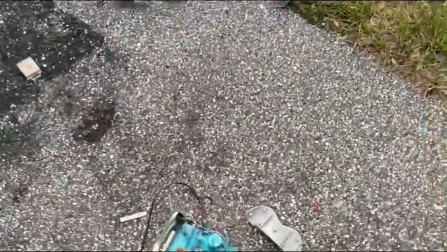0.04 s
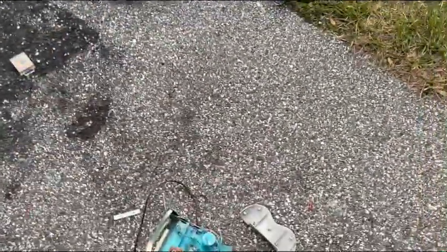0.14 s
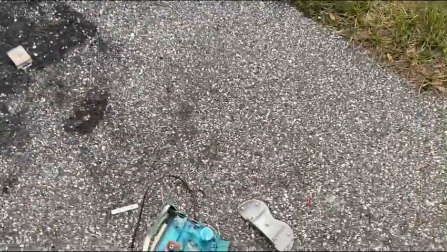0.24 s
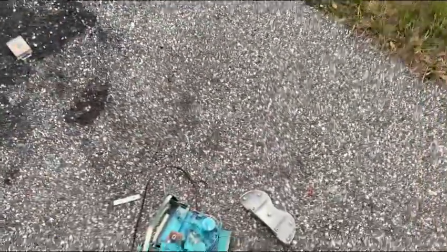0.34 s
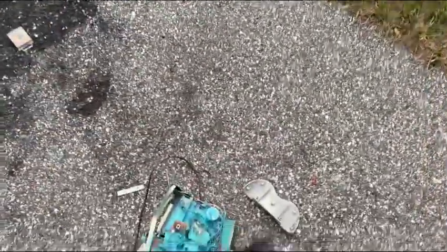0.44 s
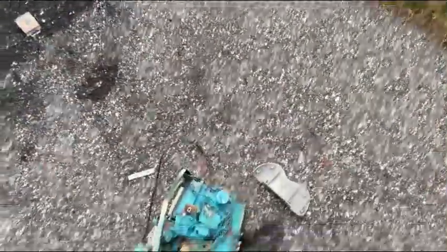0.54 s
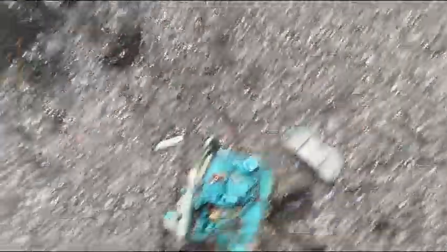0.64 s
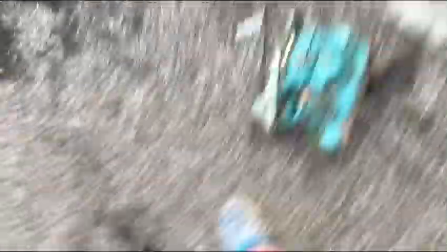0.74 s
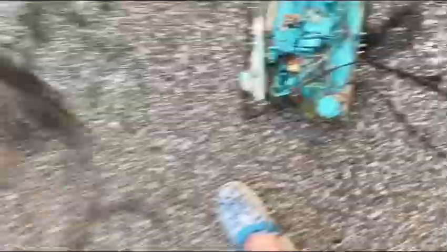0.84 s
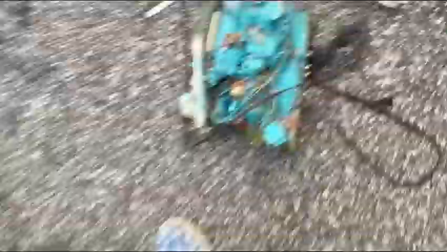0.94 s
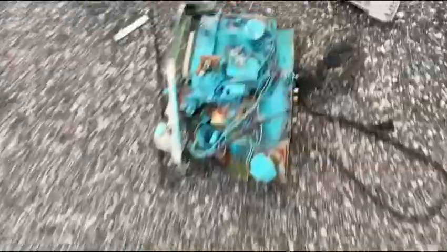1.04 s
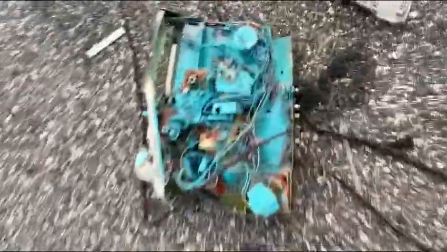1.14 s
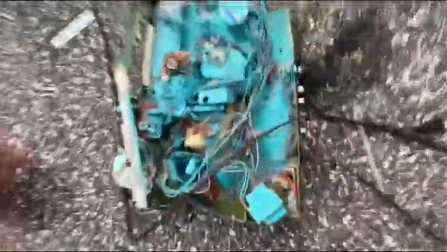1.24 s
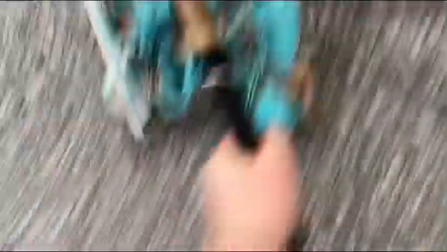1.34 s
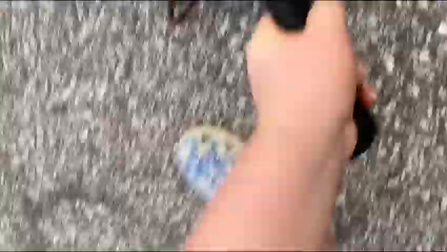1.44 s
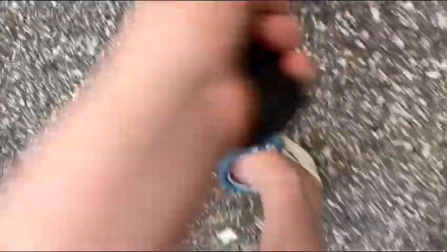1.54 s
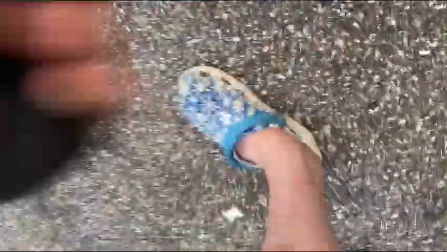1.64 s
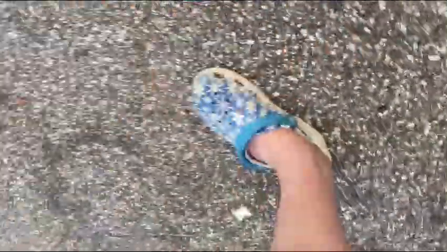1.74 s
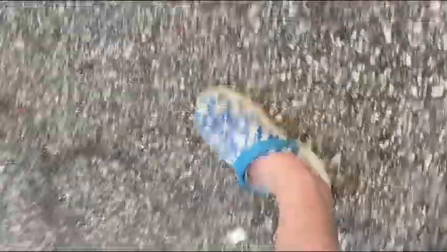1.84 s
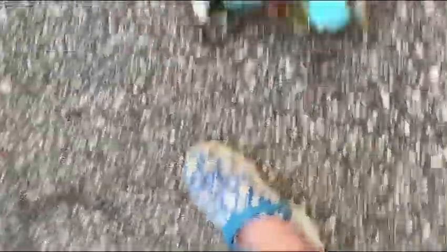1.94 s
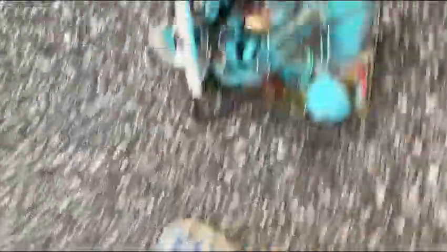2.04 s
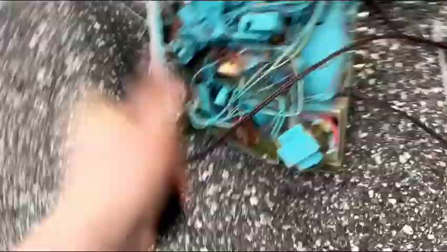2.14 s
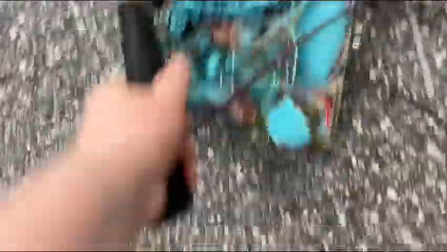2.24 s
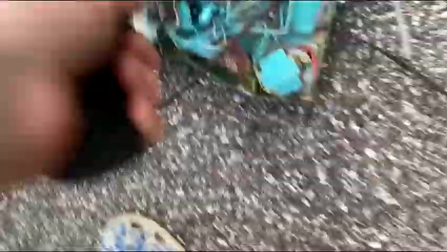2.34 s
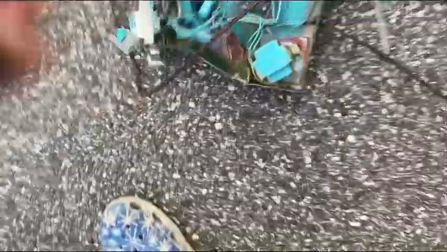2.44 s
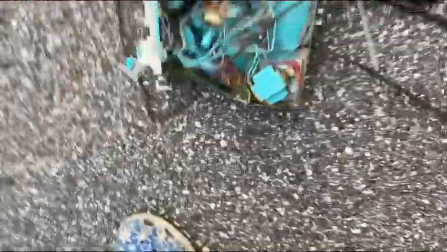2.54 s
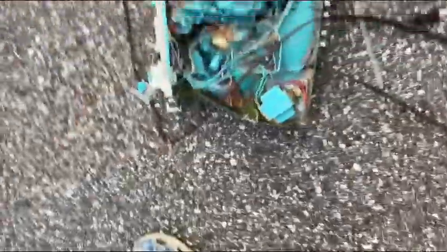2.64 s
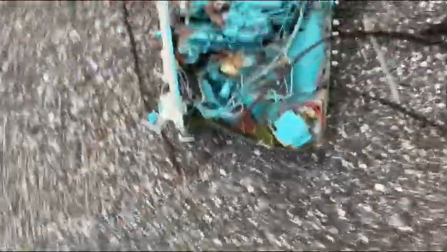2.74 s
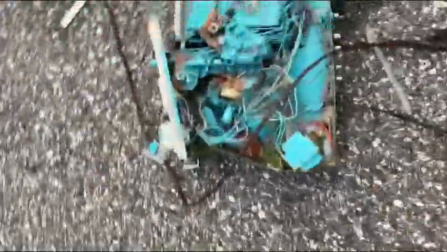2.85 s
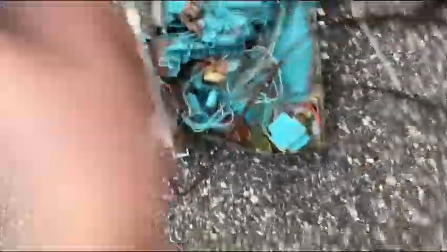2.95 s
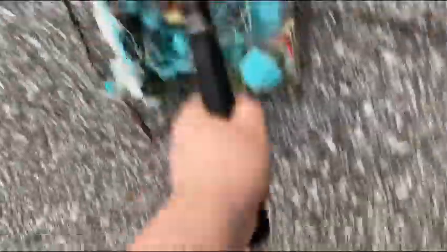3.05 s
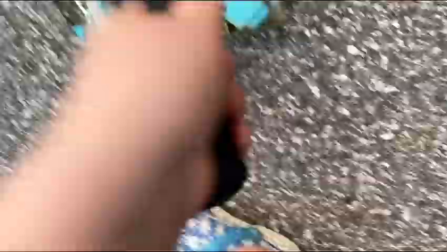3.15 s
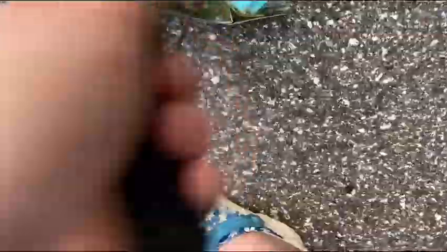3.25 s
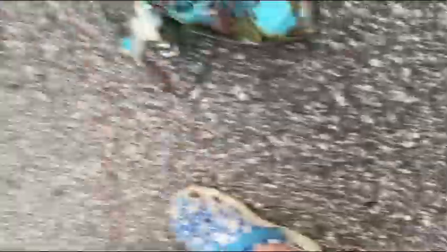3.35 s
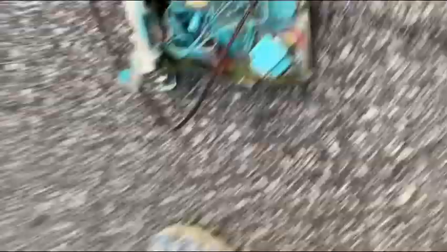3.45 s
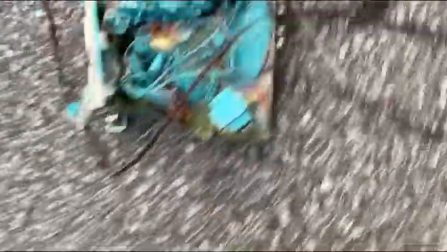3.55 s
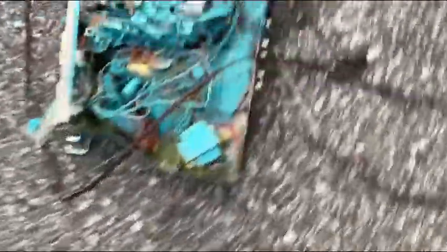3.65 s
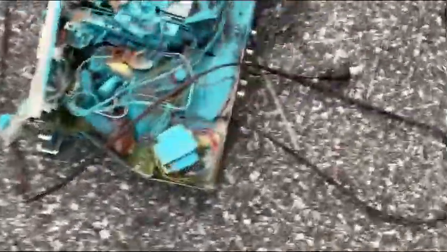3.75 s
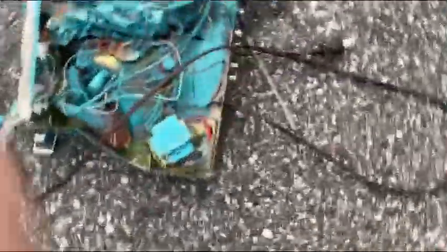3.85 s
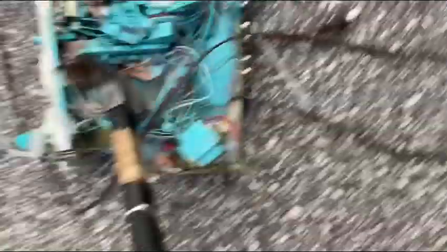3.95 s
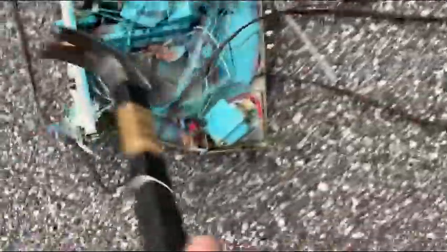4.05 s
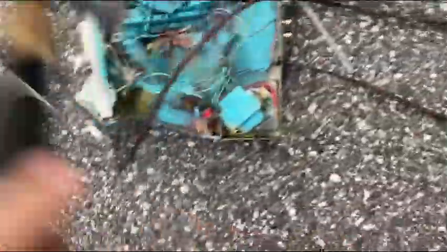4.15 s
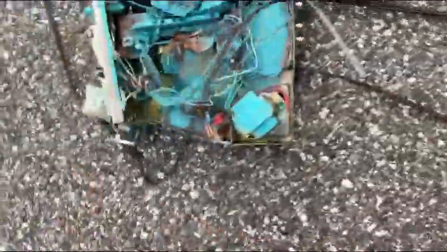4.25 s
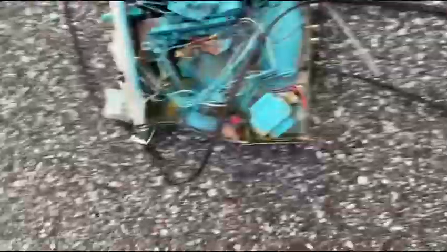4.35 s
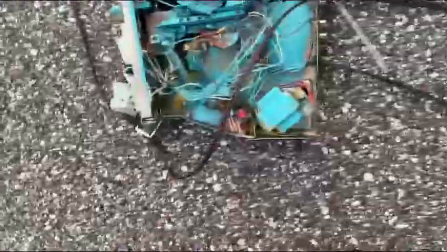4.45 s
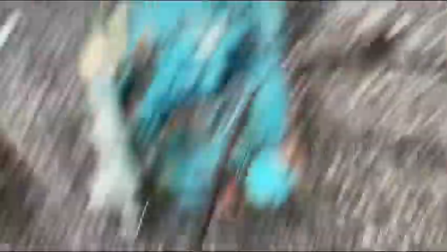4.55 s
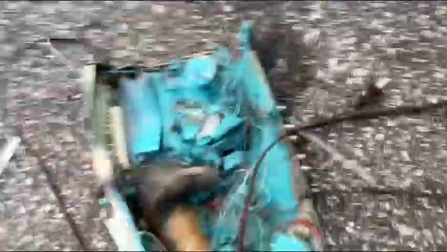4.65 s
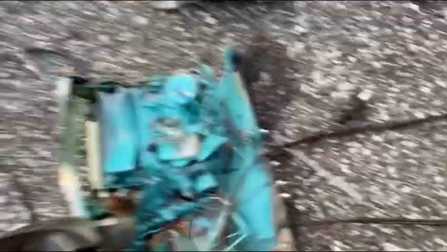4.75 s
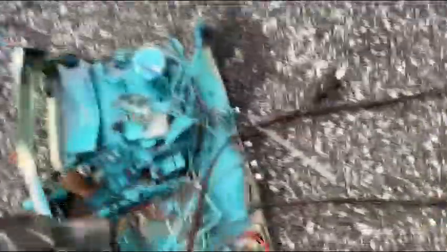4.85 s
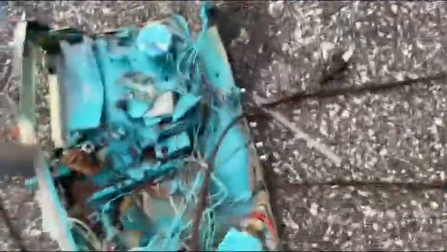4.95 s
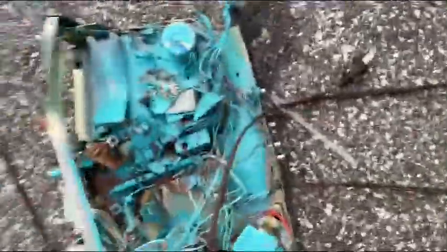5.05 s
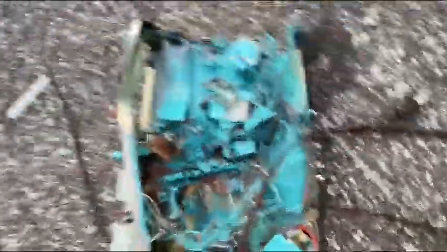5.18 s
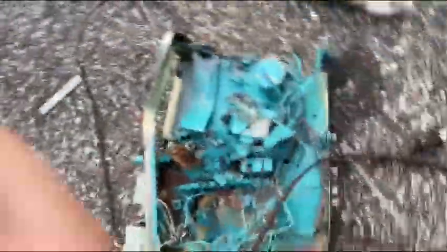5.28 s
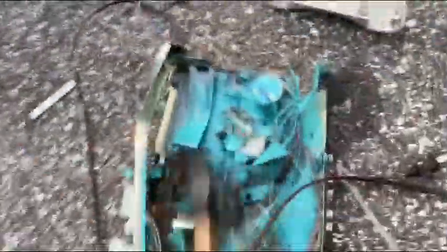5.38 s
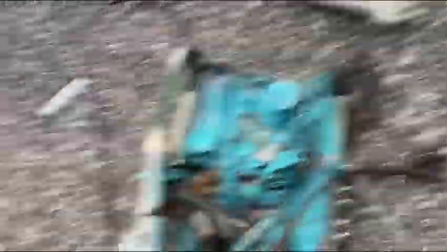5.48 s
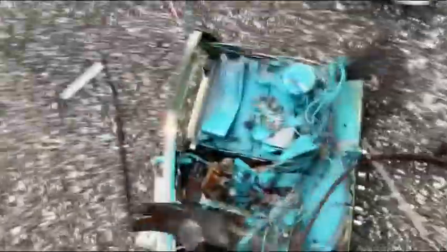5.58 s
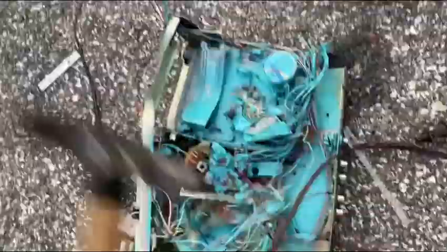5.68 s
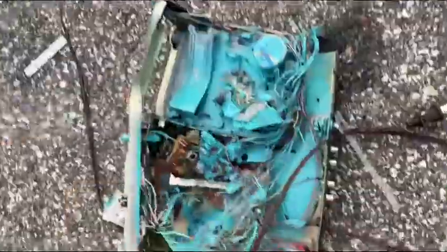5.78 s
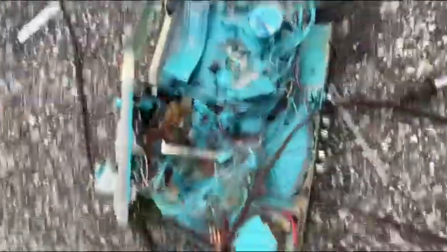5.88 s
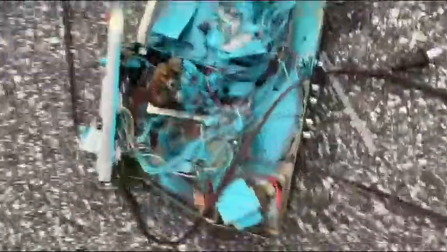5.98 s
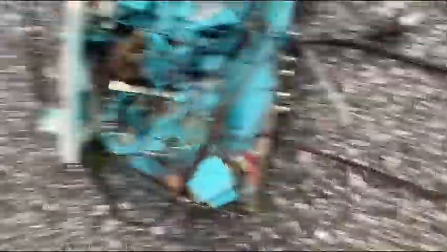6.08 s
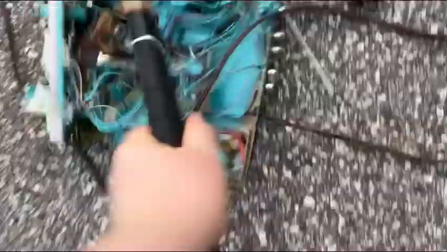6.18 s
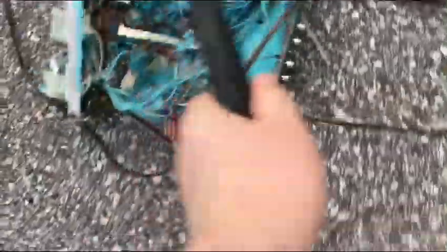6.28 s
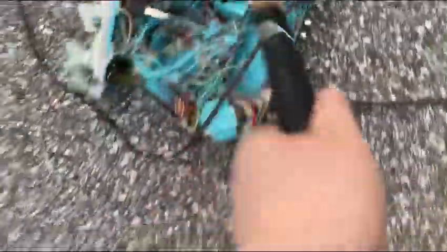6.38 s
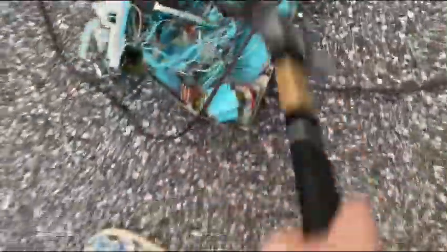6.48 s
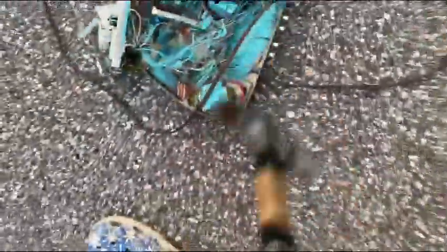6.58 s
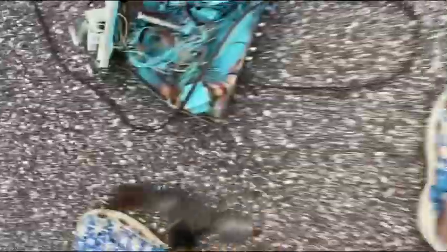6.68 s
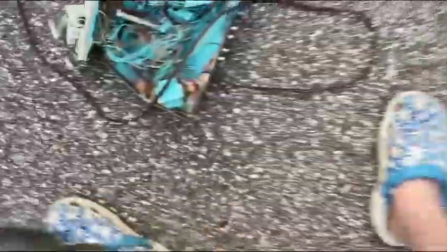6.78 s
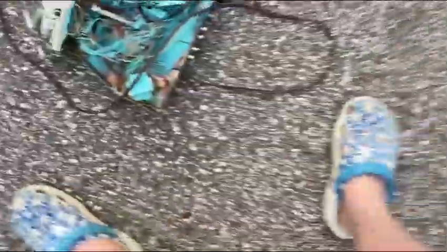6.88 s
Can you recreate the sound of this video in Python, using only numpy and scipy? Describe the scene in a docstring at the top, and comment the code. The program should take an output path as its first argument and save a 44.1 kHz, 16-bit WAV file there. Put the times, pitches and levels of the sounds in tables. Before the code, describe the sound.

Seven hard hammer blows crack a gutted plastic casing on pavement about every 0.8 seconds, debris clattering after each, wind fluttering at the microphone.

```python
"""Outdoors on asphalt, close to a hand-held recorder: seven hammer blows on a broken plastic casing.
Wind and its flutter are shaped noise in gusts over a faint hiss; jolts and wind thumps are short bass pulses.
Each blow is three noise cracks through casing modes, a jolt with a recoil, and a thin two-tone hum.
Casing and shards knock as noise bursts and rattle as clumped noise with short ringing taps.
The recorder's bass filter smears every bass pulse into a falling thump; loud peaks overload softly."""
import sys
import numpy as np
from scipy import signal
from scipy.fft import rfft, irfft, next_fast_len
from scipy.io import wavfile

SR = 44100
rng = np.random.default_rng(int(sys.argv[2]) if len(sys.argv) > 2 else 0)


def wav_record(signal):
    """Record a signal, one row per channel, as 16-bit PCM in the file named by sys.argv[1]."""
    frames = np.transpose(np.atleast_2d(signal))
    bounded = np.clip(frames, -1, 1)
    # unit amplitude maps onto the largest positive 16-bit level
    quanta = np.round(bounded * 32767).astype(np.int16)
    wavfile.write(sys.argv[1], SR, quanta)


N = 305126
HZ = np.fft.rfftfreq(next_fast_len(N + 8192, True), 1 / SR)
SIZE = 2 * len(HZ) - 2


def gain_of(db):
    """Decibels to gain."""
    return 10 ** (np.asarray(db) / 20)


def evened(x):
    """Scales to rms 1."""
    return x / np.sqrt(np.mean(x ** 2) + 1e-20)


def read(points, hz):
    """Reads a spectrum table on a log-frequency axis."""
    f, value = np.transpose(points)
    return np.interp(np.log(hz + 1), np.log(f + 1), value)


def add(mix, s, sound):
    """Lays a two-channel sound into the mix at time s."""
    part = mix[:, round(s * SR):][:, :sound.shape[-1]]
    part += sound[..., :part.shape[1]]


def coloured(x, gain):
    """Filters by a gain over HZ, scaled to keep the power of white noise."""
    unit_gain = gain / np.sqrt(np.mean(abs(gain) ** 2))
    return irfft(rfft(x, SIZE) * unit_gain, SIZE)[..., :N]


def blended(x, same_table, lean, hz):
    """Makes two unrelated spectra alike by degrees; lean is the left gain, its inverse the right."""
    same = np.clip(read(same_table, hz), 0, 1)
    right = same * x[0] + np.sqrt(1 - same ** 2) * x[1]
    return np.array([x[0] * lean, right / lean])


def ringing(x, hz, share):
    """A two-pole resonance as wide as a share of its pitch; white noise keeps its power."""
    r = np.exp(-np.pi * share * hz / SR)
    turn = 2 * np.pi * hz / SR
    return signal.lfilter([2 * np.sin(turn) * np.sqrt(1 - r)], [1, -2 * r * np.cos(turn), r * r], x)


# Bell-shaped gusts on the ports: [peak t/s, level/dB, half width to 1/e /s, flutter/dB re level]
GUSTS = [(.05, -74, .08, -4), (0.258, -39, .045, 0), (.45, -76.5, 0.061, 6), (0.678, -57, .06, 1),
         (0.829, -43, 0.09, -1), (1.061, -47, .045, -9.5), (1.201, -41.5, 0.074, -8.5),
         (1.46, -47, 0.14, -9), (1.68, -56, 0.068, -12.5), (1.81, -44.5, 0.02, -1),
         (1.889, -39.5, 0.025, -4.5), (2.03, -54.5, 0.072, -5), (2.419, -53, .09, -8.5),
         (2.901, -43.5, .05, -19.5), (3.31, -50, .07, -18.5), (3.72, -63.5, 0.22, -10.5),
         (4.011, -51, 0.066, -13.5), (4.29, -51.5, .07, -7), (5.04, -50.5, 0.049, -11.5),
         (5.15, -52, 0.049, -14), (5.58, -60, 0.086, -8.5), (5.911, -58.5, 0.084, -15.5),
         (6.39, -57, .13, -14.5), (6.601, -48.5, .065, -9), (6.87, -42, .045, -8)]
# Rumble colour: [f/Hz, relative density/dB]
RUMBLE = [(20, -32.5), (40, -0.5), (70, 4.5), (130, 1.5), (250, -8.5), (400, -42.5), (1200, -120)]
# Flutter colour: [f/Hz, relative density/dB]
FLUTTER = [(70, -19), (130, -1), (230, 4), (400, -4), (700, -17), (1200, -30.5), (2000, -60), (4000, -120)]
# Wind, left-right likeness: [f/Hz, likeness 0..1]
WIND_SAME = [(40, 0.83), (130, 0.36), (300, 0.069), (640, 0.033)]
# Outdoor hiss colour: [f/Hz, relative density/dB]
AIR = [(300, -27.5), (600, -4.5), (1000, 0.5), (2400, -1), (5000, -6), (8000, -10.5), (9500, -17),
       (16500, -30)]
AIR_DB = -74.5
CALM_DB, CALM_FLUTTER_DB = -66, -78.5  # breeze between gusts


def wind():
    """Eddies burst on the ports: lumpy low rumble, flutter above it in the gusts, faint hiss under both."""
    t = np.arange(N) / SR
    low, high, air = rng.standard_normal((3, 2, N))
    lumps_db = 3.0 * evened(coloured(rng.standard_normal(N), 1 / (1 + (HZ / 25.) ** 4)))
    low = coloured(low, gain_of(read(RUMBLE, HZ)))
    high = coloured(high, gain_of(read(FLUTTER, HZ)))

    force, flutter = gain_of(CALM_DB), gain_of(CALM_FLUTTER_DB)
    for s, db, half_s, flutter_db in GUSTS:
        gust = gain_of(db) * np.exp(-((t - s) / half_s) ** 2)
        force = force + gust
        flutter = flutter + gust * gain_of(flutter_db)
    rumble = (force * low + flutter * gain_of(lumps_db) * high) * gain_of(.5 * lumps_db)
    rumble = irfft(blended(rfft(rumble, SIZE), WIND_SAME, 1, HZ), SIZE)[:, :N]

    drift_db = 1.3 * evened(coloured(rng.standard_normal(N), 1 / (1 + (HZ / 3.) ** 4)))
    return rumble + gain_of(AIR_DB + drift_db) * coloured(air, gain_of(read(AIR, HZ)))


# Hammer blows: [t/s, relative level/dB, relative snap/dB, first piece f/Hz, later piece f/Hz,
# second crack/dB re first, last crack/dB re first, grit level/dB, relative jolt level/dB,
# jolt sharpness/dB, recoil/dB re jolt, hum level/dB]
BLOWS = [(1.263, 0, -14, 2264, 1085, -4.5, -9.5, -21, -14, 6, -6, -69),
         (2.1, -2.5, -14.5, 2797, 1479, 4, -4, -21, -16, 2, -11, -67.5),
         (2.953, 2, -15.5, 1653, 1248, -5, -21, -25.5, -15, 6.5, -8, -82.5),
         (3.833, 1.5, -15.5, 1031, 1182, -1.5, -6, -21.5, -41.5, 12, -20.5, -80.5),
         (4.578, 2, -11.5, 2908, 1184, -4, -12, -21.5, -54.5, 10.5, -23, -74),
         (5.322, 4, -16.5, 1935, 1592, -7, -19, -27.5, -17, -2.5, -5, -89),
         (6.11, 1, -10.5, 1655, 1679, -8.5, -9, -26.5, -9, -8, -3.5, -96.5)]
# Other low thumps, from wind buffets or from casing and ground:
# [t/s, relative level/dB, sharp part/dB re dull push]
THUMPS = [(.222, -32.5, -8), (.272, -26, -6.5), (1.021, -42, 0), (1.36, -36.5, -8), (1.392, -38.5, -23.5),
          (1.456, -38.5, -0.5), (1.654, -33.5, -27), (1.802, -32.5, -25), (1.887, -32.5, -11),
          (2.198, -46, -7.5), (2.289, -41, -2), (3.023, -32.5, -5), (3.128, -36, -12.5), (3.181, -43.5, 4),
          (3.248, -33.5, -19), (5.403, -39.5, -8.5), (6.184, -29.5, 1), (6.288, -34, -0.5),
          (6.337, -37.5, -1), (6.562, -32, -23)]
RECOIL_S, RECOIL_SHARP_DB = .027, -32  # the ground answers with a duller jolt


def pushes():
    """Every other thump, and the jolt and recoil of every blow."""
    rows = list(THUMPS)
    for s, *_, db, sharp_db, recoil_db, _ in BLOWS:
        rows.append((s, db, sharp_db))
        rows.append((s + RECOIL_S, db + recoil_db, RECOIL_SHARP_DB))
    return rows


# Thump colour: [f/Hz, relative level/dB]
THUMP = [(20, -25), (45, -7), (70, 5.5), (150, 1), (400, -4.5), (1000, -10)]


def thumps():
    """Single bass pushes: a dull part and a sharper part above it; the right port leads a little."""
    out, hz = np.zeros((2, N)), np.fft.rfftfreq(8192, 1 / SR)
    dull = 1 / (1 + (hz / 170.0) ** 4)
    ports = gain_of([[.5], [-.5]]) * np.exp([[-.5j], [.5j]] * (.9 * hz / (hz + 150.0)))
    for s, db, sharp_db in pushes():
        edge = dull + gain_of(sharp_db) * (1 - dull) / (1 + (hz / 663.0) ** 4)
        push = irfft(gain_of(read(THUMP, hz)) * edge * ports)
        push = np.roll(push, 4096, axis=1)  # centred in its buffer
        add(out, s - 4096 / SR, gain_of(db + 42.0) * push)
    return out


# Shell modes: [f/Hz, width/Hz, relative level/dB]
CASING = [(982, 40, -16.5), (1220, 13, -1), (1460, 27, -11.5), (1760, 92, -8.5), (2280, 140, -14.5),
          (2900, 60, -8.5), (4320, 630, -11.5), (6800, 250, -5)]
# Broad colour of the plastic: [f/Hz, relative level/dB]
SHELL = [(300, -37.5), (600, -23), (900, 5.5), (1600, 5.5), (3000, 2.5), (5000, -3.5), (8000, -30)]
# Colour of a snap: [f/Hz, relative level/dB]
SNAP = [(3000, -27.5), (5000, -1), (7000, 2.5), (9000, -2), (11000, 0), (14000, -4.5), (16500, -13.5)]
# Casing at the ports, left-right likeness: [f/Hz, likeness 0..1]
PORTS_SAME = [(100, 0.81), (700, 0.95), (1400, .85), (3100, 0.7), (6800, 0.3), (8000, .8), (16000, 1)]
# Casing at the ports, left-right level: [f/Hz, left re right/dB]
PORTS_LEAN = [(400, -1.5), (700, 8.5), (1300, -4.5), (2400, 2.5), (4400, 4.5), (8000, 0), (15000, -1)]
# Right-channel phase turns half a cycle across each: [f/Hz]
FLIPS_HZ = [8290, 9820, 12420, 13700]


def casing(body, snap, loose):
    """Excitation rings the shell's modes; snaps keep their treble; all reach two ports."""
    modes = sum(gain_of(db) * width * f / (f ** 2 - HZ ** 2 + 1j * width * HZ) * 1j
                for f, width, db in CASING)
    sound = coloured(body, gain_of(read(SHELL, HZ)) + 2.4 * modes)
    sound = sound + coloured(snap, gain_of(read(SNAP, HZ)))
    sound = sound + loose * [[1], [1]]
    ports = blended(rfft(sound, SIZE), PORTS_SAME, gain_of(read(PORTS_LEAN, HZ) / 2), HZ)
    half_turns = sum(1 + np.tanh((HZ - flip_hz) / 280.0) for flip_hz in FLIPS_HZ)
    ports[1] *= np.exp(.5j * np.pi * half_turns)
    return irfft(ports, SIZE)[:, :N]


# Small knocks of casing and shards: [t/s, relative level/dB, relative snap/dB, loose piece f/Hz]
KNOCKS = [(1.399, -38.5, -1.5, 1296), (1.44, -28, -20, 1170), (1.458, -20.5, -13.5, 2393),
          (1.493, -29, -7, 2930), (1.499, -19.5, -22, 1232), (1.558, -59.5, -5, 5550),
          (1.621, -59, 0, 5000), (1.708, -62, -3, 6460), (1.721, -57, -14, 3000), (1.755, -58, -12.5, 3000),
          (2.153, -18, -15.5, 1218), (2.213, -30, -11, 1237), (2.234, -20, -24, 1247),
          (2.253, -25, -35.5, 1280), (2.265, -25.5, -20.5, 1280), (2.311, -34, -16, 1126),
          (2.344, -32, -24, 2000), (2.373, -32, -16, 1130), (2.439, -45, -8.5, 1200),
          (2.597, -47, -36, 967), (2.979, -23, -8.5, 3596), (3.127, -6.5, -19, 2584),
          (3.164, -26, -13, 981), (3.258, -39, -33, 1186), (3.953, -35.5, -6, 4032),
          (4.018, -33, -38, 3300), (4.082, -40.5, -22, 6070), (4.144, -28.5, -13, 4590),
          (4.643, -25.5, -16.5, 1180), (4.717, -31, -9, 990), (4.737, -35, -27, 1228),
          (4.744, -33.5, -23.5, 3400), (4.767, -42.5, -21, 1064), (4.803, -52, -12, 934),
          (4.853, -55, -23, 3470), (4.881, -56.5, -11, 4360), (4.918, -58.5, -25, 3200),
          (5.266, -47.5, -11.5, 1033), (5.314, -16, -12.5, 2099), (5.364, -31, -12.5, 1346),
          (5.488, -45, -4.5, 4960), (5.517, -36.5, -16, 1687), (5.574, -28.5, -9, 4800),
          (5.673, -49, -3, 5400), (5.713, -30.5, -12, 1700), (5.753, -36, -13, 4260),
          (5.77, -38, -10, 4320), (5.797, -42, -20, 4400), (5.835, -36.5, -14, 1620),
          (5.887, -59, -14, 7000), (5.956, -39, -13, 4320), (6.276, -28.5, -11, 1117),
          (6.302, -18, -12, 1861), (6.389, -29, -19, 1375), (6.53, -44.5, -23, 1380)]
SECOND_S, LAST_S = .005, .013  # lags of a blow's second and last crack
RING_DB, SHARD_RING_DB, SHARD_HZ = -2.6, 6, 4022  # small shards, above SHARD_HZ, ring more


def cracks():
    """Every knock, and the three cracks of every blow, each with its ring level."""
    rows = []
    for s, db, snap_db, hz1, hz2, second_db, last_db, *_ in BLOWS:
        rows.append((s, db, snap_db, hz1))
        rows.append((s + SECOND_S, db + second_db, snap_db, hz2))
        rows.append((s + LAST_S, db + last_db, snap_db, hz2))
    return [(*row, SHARD_RING_DB if row[-1] > SHARD_HZ else RING_DB) for row in rows + list(KNOCKS)]


def knocks():
    """Each knock is a burst of uneven fractures that dies fast, into shell, treble and one loose piece."""
    body, snap, loose = np.zeros((3, 2, N))
    t = np.arange(6000) / SR
    rise = 1 - np.exp(-t / .0008)
    decay = gain_of(-2200. * t) + gain_of(-12.0 - 970.0 * t)  # quick crack, slower crumble; dB/s
    for s, db, snap_db, ring_hz, ring_db in cracks():
        noise = rng.standard_normal((4, 2, len(t)))
        uneven = gain_of(db - 10.0 + 2.8 * noise[3, 0])  # fractures differ in size
        shape = uneven * rise * decay
        # what rings the piece is lost to the shell
        add(body, s, shape * noise[0] / np.sqrt(1 + gain_of(2 * ring_db)))
        add(snap, s, gain_of(snap_db + 10.5) * shape * noise[1])
        add(loose, s, gain_of(ring_db) * ringing(shape * noise[2], ring_hz, share=.1))
    return casing(body, snap, loose)


SWELL_DB_S, STOP_S = 251, 0.0067  # rise to the peak; gate ramp


def rattle(t, s, db, fade_db_s, length_s):
    """Level of one rattle: swell, fade, stop; nothing swells ahead of a blow."""
    blow_s = max(row[0] for row in BLOWS if row[0] < s)
    gate = np.clip((t - blow_s) / STOP_S, 0, 1) * np.clip((s + length_s - t) / STOP_S, 0, 1)
    drop_db = np.where(t < s, SWELL_DB_S * (s - t), fade_db_s * (t - s))
    return gate * gain_of(db - drop_db)


# Casing slides and rattles after a blow or hop: [peak t/s, relative level/dB, fade/(dB/s),
# length after peak/s, relative treble/dB, panel f/Hz, relative panel level/dB]
RATTLES = [(1.297, -39, 118.5, 0.11, -7.5, 1416, -9), (1.469, -39.5, 288, .09, -11, 1283, -11),
           (1.664, -69.5, 10, 0.089, -3, 2380, -4.5), (2.16, -40, 222, .05, -9.5, 1125, -7),
           (2.251, -38.5, 161.5, 0.08, -7.5, 1215, -9), (2.37, -46.5, 350, 0.082, -11.5, 1156, -6.5),
           (2.455, -59, 57, 0.15, -10, 1290, -8), (3.0, -57, 38, 0.098, -5, 1052, -7.5),
           (3.15, -38.5, 171.5, 0.66, -8, 1067, -8), (3.882, -47, 54, 0.32, -7, 1100, -12),
           (4.174, -61, 65, 0.046, 2, 4500, -0.5), (4.614, -35.5, 156.5, 0.06, -6, 1147, -7.5),
           (4.678, -40.5, 220.5, .2, -10, 1170, -3), (5.371, -47.5, 169.5, 0.14, -7, 1660, -13),
           (5.588, -45, 235, .11, -5.5, 1820, -12), (5.769, -59, 72, 0.037, 2, 4280, 2),
           (6.149, -40.5, 185.5, .1, -5.5, 1660, -2.5), (6.318, -34.5, 271, .1, -7, 1412, -8),
           (6.44, -57.5, 290, 0.097, -5, 1391, -7)]
# spray of grit just after each blow
BURST_S, BURST_FADE_DB_S, BURST_TREBLE_DB, BURST_PANEL_DB = 0.015, 801, -7, -11


def rattles():
    """Grit hisses in clumps under a slow level, a panel rings along, shards ring at their own pitch."""
    t, level, treble, loose = np.arange(N) / SR, np.zeros(N), np.zeros(N), np.zeros(N)
    hits = gain_of(np.minimum(rng.exponential(1, N), 4)) * (rng.random(N) < 150. / SR)  # 150 per s
    clumps = evened(.8 + signal.lfilter([1], [1, -np.exp(-1 / (.006 * SR))], hits))  # 6 ms decay
    body, snap, panel = rng.standard_normal((3, 2, N)) * clumps

    bursts = [(s + BURST_S, grit_db, BURST_FADE_DB_S, .1, BURST_TREBLE_DB, hz2, BURST_PANEL_DB)
              for s, _, _, _, hz2, _, _, grit_db, *_ in BLOWS]
    for s, db, fade_db_s, length_s, treble_db, ring_hz, ring_db in bursts + list(RATTLES):
        inside = rattle(t, s, db, fade_db_s, length_s)
        level += inside
        treble += inside * gain_of(treble_db)
        loose += gain_of(ring_db) * ringing(panel[0] * clumps * inside, ring_hz, share=.06)

    tap_t = t[:2500]
    tap_shape = gain_of(-60 * tap_t / 0.036) * (1 - np.exp(-tap_t / 0.00031))  # T60 36 ms
    for hz in np.geomspace(900., 7500., num=24):
        strikes = gain_of(3. * np.minimum(rng.exponential(1, N), 4)) * (rng.random(N) < 14. / SR)
        weight = level * gain_of(read(SHELL, hz)) + .5 * treble * gain_of(read(SNAP, hz))
        ring = tap_shape * np.sin(2 * np.pi * hz * rng.uniform(1.0, 1.04) * tap_t)
        loose += gain_of(-9.) * signal.oaconvolve(strikes * weight, ring)[:N]
    return casing(gain_of(-4.5) * body * level, snap * treble, loose)


# Hum modes: [f/Hz, relative level/dB]
HUM_MODES = [(915.2, 0), (1373, -10)]
HUM_T60_S = 7.1  # decay rate inside the 1 s window


def hum():
    """Two thin modes set off by each blow, decaying slowly under a 1 s window."""
    out, t = np.zeros((2, N)), np.arange(SR) / SR
    modes = sum(gain_of(level_db) * np.sin(2 * np.pi * hz * t) for hz, level_db in HUM_MODES)
    for s, *_, db in BLOWS:
        add(out, s, gain_of(db - 60 * t / HUM_T60_S) * modes * signal.windows.tukey(SR, .2))
    return out


def scene():
    """All sources at the two ports."""
    return wind() + thumps() + knocks() + rattles() + hum()


EDGE_HZ = 16600


def record(dry):
    """The bass filter delays each low tone by about the same number of cycles; soft overload; band limit."""
    turns = 1.5
    lag = np.exp(2j * np.pi * turns * np.log(1 + 1200.0 / (HZ + 7.9)))
    smeared = irfft(rfft(dry, SIZE) * lag, SIZE)[:, :N]
    wet = 1.5 * np.tanh(smeared / 1.8)
    band = signal.firwin(511, EDGE_HZ, window=("kaiser", 9), fs=SR)
    return signal.oaconvolve(wet, band[None], "same")


dry = scene()
out = record(dry)
wav_record(out)
```